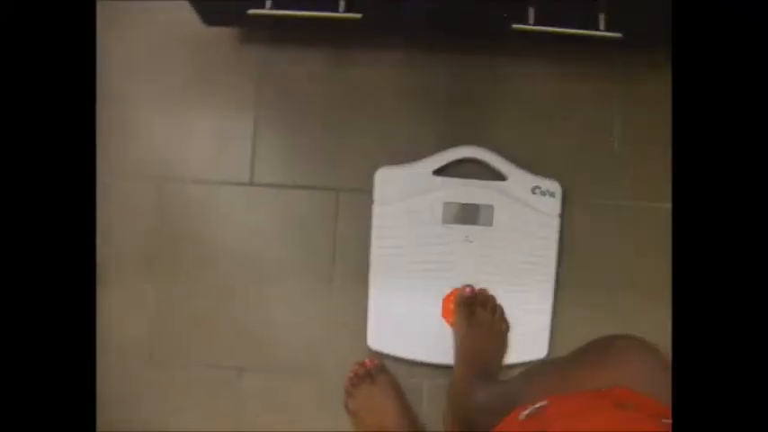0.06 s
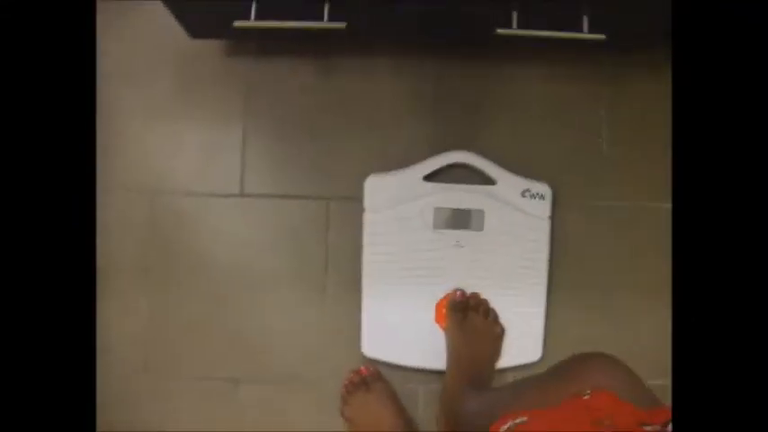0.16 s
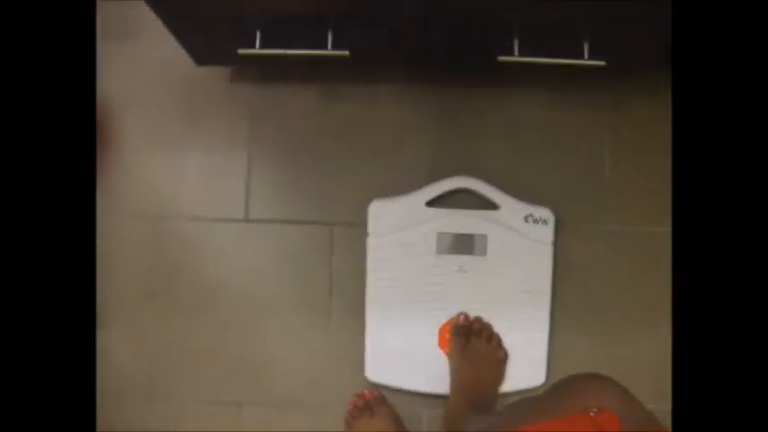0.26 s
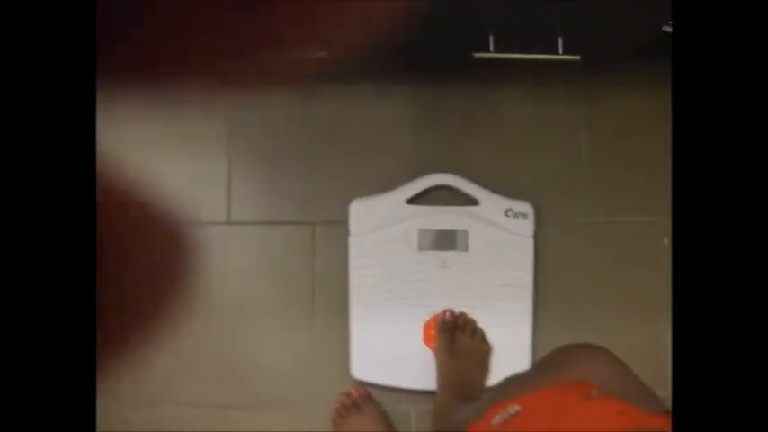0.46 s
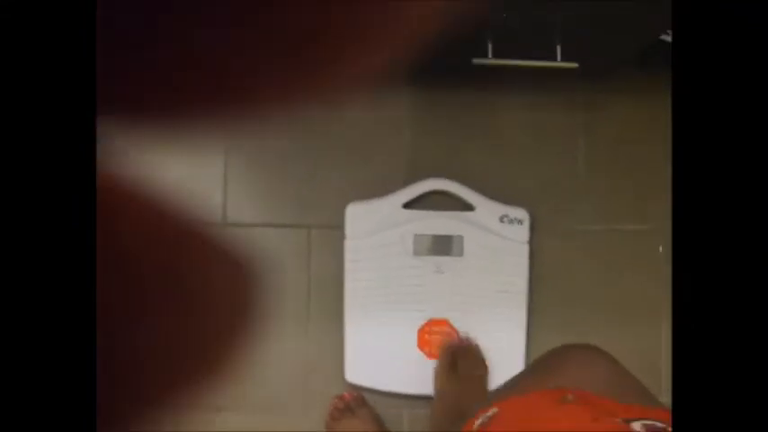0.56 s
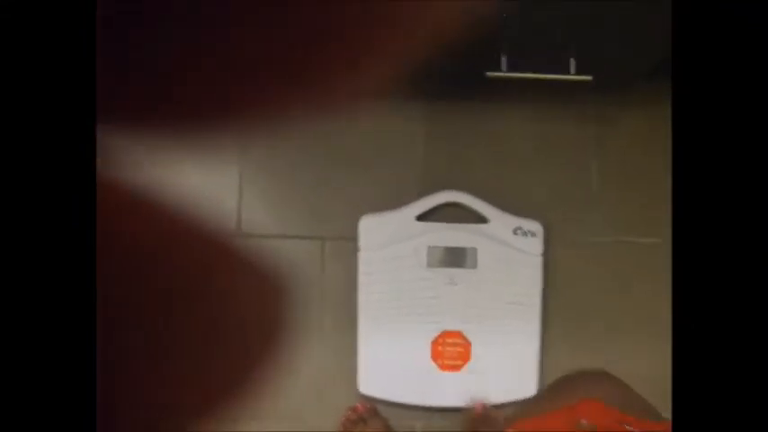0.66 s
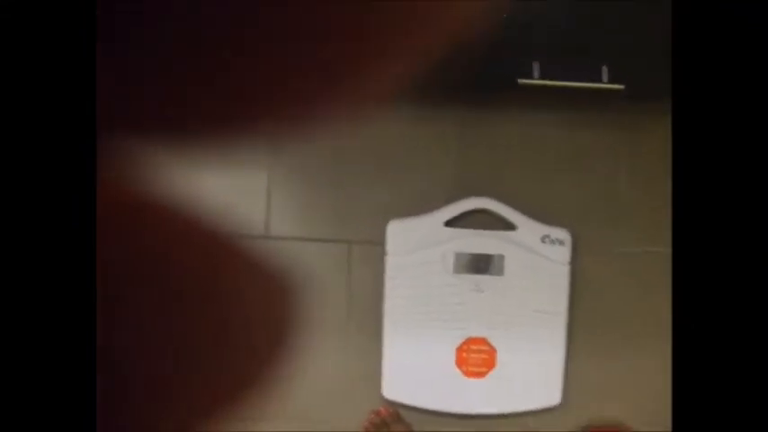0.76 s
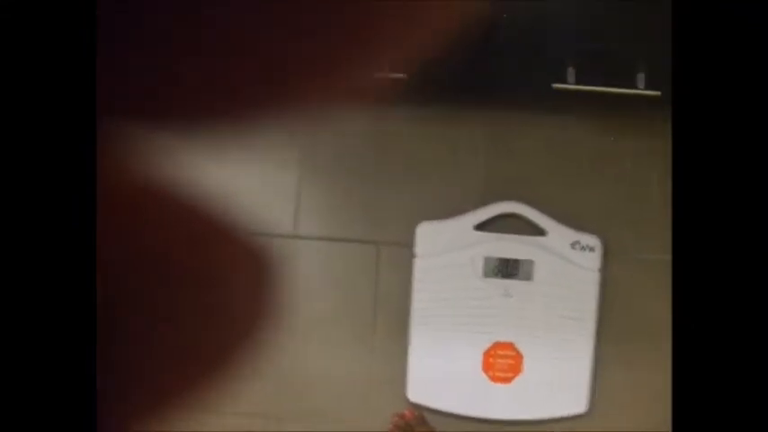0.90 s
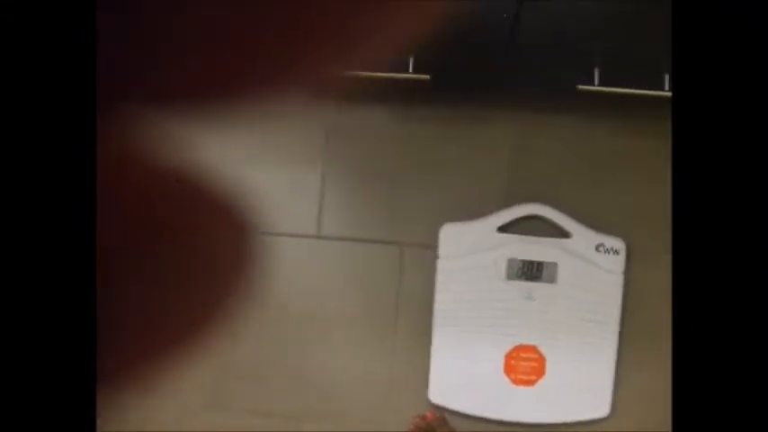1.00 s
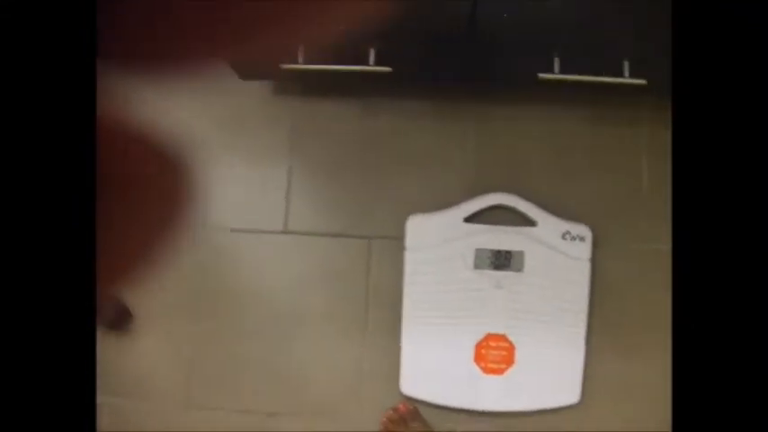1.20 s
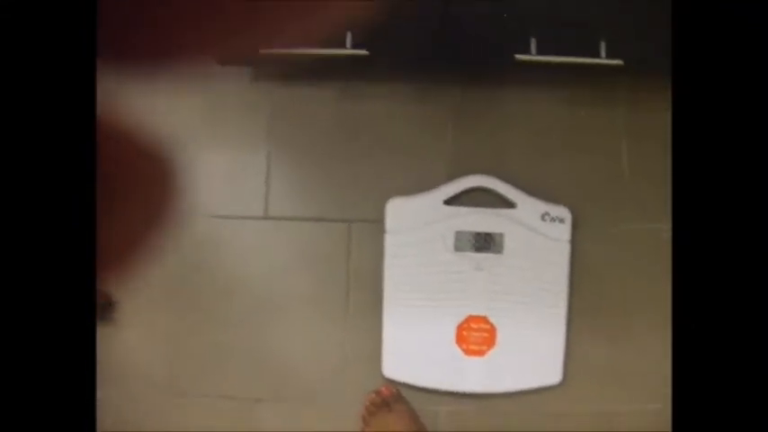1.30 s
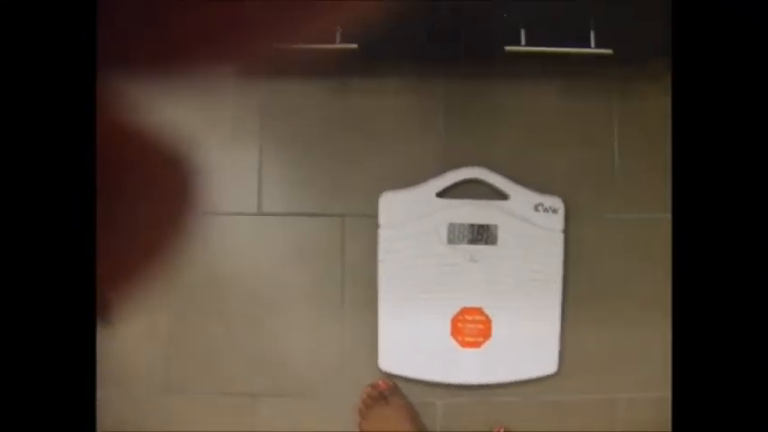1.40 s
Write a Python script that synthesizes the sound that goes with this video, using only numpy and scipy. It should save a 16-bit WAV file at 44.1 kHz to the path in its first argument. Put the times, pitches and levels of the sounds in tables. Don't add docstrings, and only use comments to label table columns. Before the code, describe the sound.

Foot tap on a plastic scale with a quick rattle, then skin peeling away over faint hum

```python
import sys
import numpy as np
from scipy import signal
from scipy.fft import rfft, irfft
from scipy.io import wavfile

SR = 44100
rng = np.random.default_rng(int(sys.argv[2]) if len(sys.argv) > 2 else 0)


def gain_from_db(level_db):
    decades = np.asarray(level_db, float) / 20
    return 10 ** decades


def generate_wav(sig):
    pcm = np.round(np.clip(np.atleast_2d(sig).T, -1, 1) * 32767).astype(np.int16)
    wavfile.write(sys.argv[1], SR, pcm)


N = 63945
RING = 6000


def evened(x):
    return x / np.sqrt(np.mean(x ** 2) + 1e-20)


def read(points, hz):
    f, value = np.transpose(points)
    return np.interp(np.log(hz + 1), np.log(f + 1), value)


def colour(x, curve_db):
    gain = gain_from_db(read(curve_db, np.fft.rfftfreq(len(x), 1 / SR)))
    return irfft(rfft(x) * gain, len(x))


def add(mix, s, sound):
    part = mix[round(s * SR):][:len(sound)]
    part += sound[:len(part)]


def slow(hz):
    t = np.arange(N) / SR
    return evened(sum(np.sin(2 * np.pi * (f * hz * t + rng.random())) for f in np.geomspace(.1, 1, 10)))


MOTOR_HZ = [59.2, 199, 253, 296.3, 318, 425]
# [level/dB rms, waver/dB]
MOTOR_LINES = [(-47.5, 0.47), (-59.5, 2.5), (-62, 2.5), (-48, 2), (-64.5, 0), (-57.5, 3.5)]
# [centre t/s, width/s, level/dB]
MOTOR_SAG = (0.51, 0.14, -8)
SAGGING_LINE = 3
# [f/Hz, level/dB]
WASH = [(20, -2.5), (40, -9.5), (150, -12.5), (200, -6.5), (430, -2.5), (560, -8), (2000, -19.5),
        (8000, -25.5)]
WASH_DB = -48.5


def motor():
    t = np.arange(N) / SR
    centre_s, width_s, depth_db = MOTOR_SAG
    sag_db = depth_db * np.exp(-((t - centre_s) / width_s) ** 2)
    hum = np.zeros(N)
    for i, (hz, (db, waver_db)) in enumerate(zip(MOTOR_HZ, MOTOR_LINES)):
        level_db = db + waver_db * slow(12.0) + sag_db * (i == SAGGING_LINE)
        hum += np.sqrt(2) * gain_from_db(level_db) * np.sin(2 * np.pi * (hz * t + rng.random()))
    wash = evened(colour(rng.standard_normal(N), WASH))
    return hum + gain_from_db(WASH_DB + 0.79 * slow(8.0)) * wash


# [f/Hz, t60/s]
ROOM_T60 = [(200, .6), (500, 0.37), (1400, 0.52), (3500, .35), (7000, 0.27)]
ROOM_GAP_S = 0.006


def room(x):
    taps = np.zeros(SR)
    at = np.arange(round(ROOM_GAP_S * SR), SR - 20, 20)
    taps[at + rng.integers(0, 20, len(at))] = rng.choice([-1., 1.], len(at))
    hz, t, z = signal.stft(taps, SR, nperseg=256)
    decay = gain_from_db(-60 * t / read(ROOM_T60, hz)[:, None])
    tail = signal.istft(z * decay, SR, nperseg=256)[1]
    return signal.fftconvolve(x, tail / np.linalg.norm(tail))[:N]


REGION_DB_PER_OCT2 = -9.5


def shell_ring(modes, region_hz, spread_db):
    t = np.arange(RING) / SR
    ring = np.zeros(RING)
    for hz, db, t60 in modes:
        chance_db = spread_db * rng.standard_normal()
        region_db = REGION_DB_PER_OCT2 * np.log2(hz / region_hz) ** 2
        ring += gain_from_db(db + chance_db + region_db - 60 * t / t60) * np.sin(2 * np.pi * hz * t)
    return ring / np.abs(ring).max()


TICK_HZ, TICK_T60 = 1768, 0.031
DULL_HZ, SPREAD_S = 1719, 0.00069


def knock(modes, level_db, push_ms, tick_db, region_hz):
    t = np.arange(RING) / SR
    push = np.sin(np.pi * np.minimum(t / (push_ms * 1e-3), 1)) ** 2
    ring = shell_ring(modes, region_hz, spread_db=6.5) * (1 - np.exp(-t / SPREAD_S))
    dull = signal.ellip(5, 1, 25, DULL_HZ, fs=SR, output="sos")
    body = signal.sosfilt(dull, signal.fftconvolve(ring, push)[:RING])
    band = signal.butter(4, [TICK_HZ, 2 * TICK_HZ], "band", fs=SR, output="sos")
    tick = 2.66 * signal.sosfilt(band, rng.standard_normal(RING)) + 0.73 * rng.standard_normal(RING)
    tick *= gain_from_db(tick_db - 60 * t / TICK_T60)
    return gain_from_db(level_db) * (tick - body / np.abs(body).max())


def stroke(s, rise, t60, db):
    t = np.arange(N) / SR
    return np.clip((t - s) / rise, 0, 1) ** 2 * gain_from_db(db - 60 * np.maximum(t - s - rise, 0) / t60)


SLIPS_PER_S, SLIP_SPREAD_DB = 8600, 2


def slips():
    size = gain_from_db(SLIP_SPREAD_DB * np.minimum(rng.exponential(1, N), 4))
    happens = rng.random(N) < SLIPS_PER_S / SR
    return evened(size * rng.choice([-1., 1.], N) * happens)


# [t/s, rise/s, fall t60/s, level/dB, centre f/Hz]
RUSTLES = [
    (0.012, 0.0018, 0.024, -37, 4940),
    (0.271, 0.00058, 0.0097, -36, 5170),
    (.2810, 0.0012, 0.035, -38.5, 5640),
    (0.268, 0.029, .6, -45, 5400),
    (.3090, 0.0012, .015, -38.5, 5500),
    (0.328, 0.011, .3, -49.5, 4000),
    (0.418, 0.016, 0.22, -58, 5310),
    (.882, 0.0054, 0.1, -44.5, 2690),
    (.933, .005, 0.053, -43, 2900),
]
RUSTLE_OCT = 1
# [t/s, level/dB, push/ms, tick/dB, struck region f/Hz]
NEAR_TAPS = [
    (0.0159, -31, 0.32, -9.5, 960),
    (0.0576, -27.5, 0.74, -17, 570),
    (0.2829, -31.5, 0.93, -27, 440),
    (0.3084, -16.5, .3, -32, 788),
]
# [f/Hz, level/dB, t60/s]
CAMERA = [(284.8, 1.5, .022), (435, -7.5, 0.017), (570, -2, .025), (816, -4.5, 0.021), (1150, -4, .01),
          (1500, -1, .008)]


def handling():
    hz = np.fft.rfftfreq(N, 1 / SR) + 1
    grains, out = slips(), np.zeros(N)
    for s, rise, t60, db, centre_hz in RUSTLES:
        band = np.exp(-(np.log2(hz / centre_hz) / RUSTLE_OCT) ** 2)
        out += 2 * irfft(rfft(grains * stroke(s, rise, t60, db)) * band, N)
    for s, *tap in NEAR_TAPS:
        add(out, s, knock(CAMERA, *tap))
    return out


# [f/Hz, level/dB, t60/s]
PLATFORM = [(236.4, -13.5, 0.073), (299.4, -18, 0.014), (411.5, -9.5, .035), (470, -2, 0.037),
            (557.3, -6, .04), (681.5, -9, 0.042), (817.7, 0, 0.029), (960, -9.5, 0.021), (1100, -9, 0.03),
            (1184, -2.5, 0.038), (1452, -2, 0.042), (1519, -9.5, .025), (1679, -8.5, .02),
            (3200, -16, 0.005)]
# [t/s, rise/s, fall t60/s, level/dB, share into the platform/0-1]
PEELS = [
    (0.408, 0.035, 0.29, -44, .6),
    (0.508, .033, 0.17, -24.5, 0.63),
]
# [f/Hz, level/dB]
SKIN = [(300, -5), (1500, 1.5), (3300, 2.5), (4200, -2), (5500, -7.5), (7500, -10.5)]


def skin_peel():
    fizz = sum((1 - share) * stroke(*peel) for *peel, share in PEELS)
    push = sum(share * stroke(*peel) for *peel, share in PEELS)
    out = 2 * colour(slips() * fizz, SKIN)
    foot_damping = gain_from_db(-300 * np.arange(RING) / SR)
    for hz in (560, 850, 1500):
        ring = shell_ring(PLATFORM, hz, spread_db=5.5) * foot_damping
        out += 0.89 * signal.fftconvolve(slips() * push, ring / np.linalg.norm(ring))[:N]
    return out


# [t/s, level/dB, push/ms, tick/dB, struck region f/Hz]
CONTACTS = [
    (.1030, -11, 0.35, -11, 1222),
    (0.1068, -5.5, .3, -19, 1150),
    (0.1097, -7.5, 0.23, -18.5, 961),
    (.1150, -2, .5, -25.5, 480.5),
    (0.1192, -8.5, 0.44, -32.5, 470),
    (0.129, -14.5, 0.44, -20.5, 556),
    (0.1444, -13, 0.4, -34, 511),
    (0.152, -13.5, 0.46, -34, 542),
    (0.5052, -29.5, .8, -34, 462),
]


def foot_slap():
    out = np.zeros(N)
    for s, *contact in CONTACTS:
        add(out, s, knock(PLATFORM, *contact))
    return out


ROOM_DB = -7
RADIATE_HZ = 192.2


def scene():
    background = motor()
    near = handling()
    foot = skin_peel() + foot_slap()
    sound = foot + near + gain_from_db(ROOM_DB) * room(foot + 0.41 * near)
    radiate = signal.butter(4, RADIATE_HZ, "high", fs=SR, output="sos")
    return (signal.sosfilt(radiate, sound) + background)[None]


def low_pass(x):
    return signal.sosfilt(signal.butter(12, 8870, fs=SR, output="sos"), x)


STORE_HZ, STEP, EDGE_HZ = 16000, 1 / 128, 7950


def record(dry):
    low = np.floor(signal.resample_poly(dry, STORE_HZ, SR, axis=1) / STEP) * STEP
    smooth = signal.firwin(441 * 90 + 1, EDGE_HZ, window=("kaiser", 9), fs=441 * STORE_HZ)
    mix = signal.resample_poly(low, SR, STORE_HZ, axis=1, window=smooth)[:, :N]
    return low_pass(mix)


dry = scene()
out = record(dry)
generate_wav(out)
```